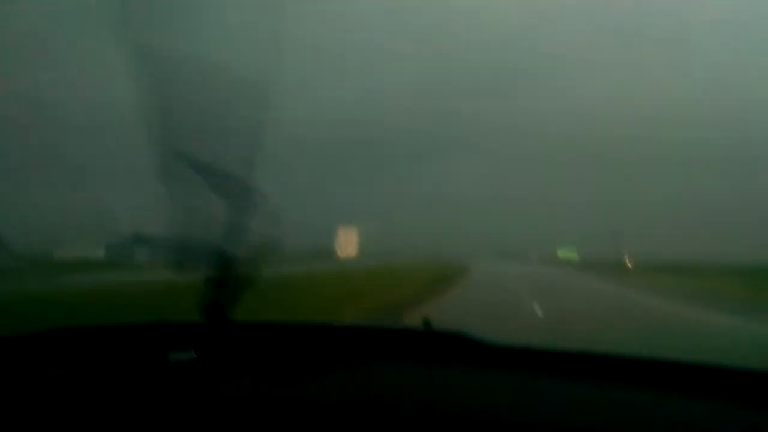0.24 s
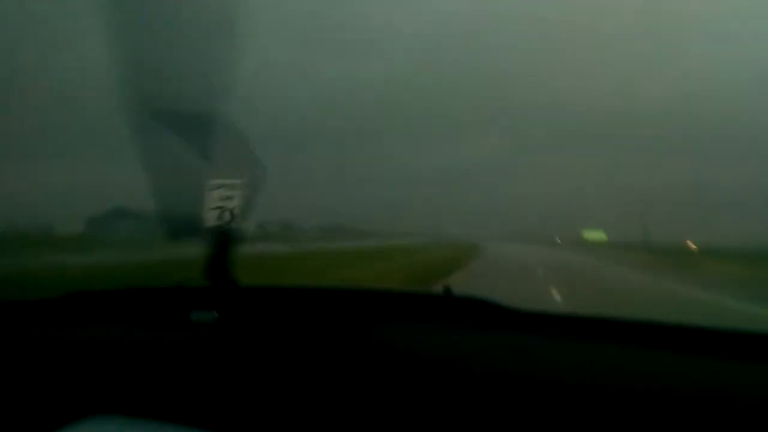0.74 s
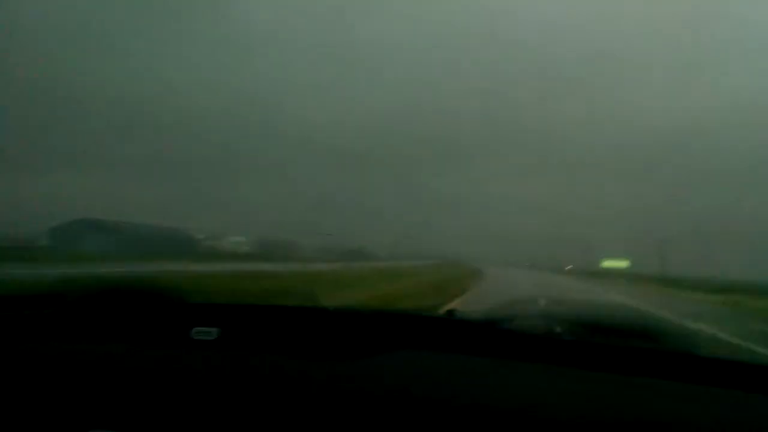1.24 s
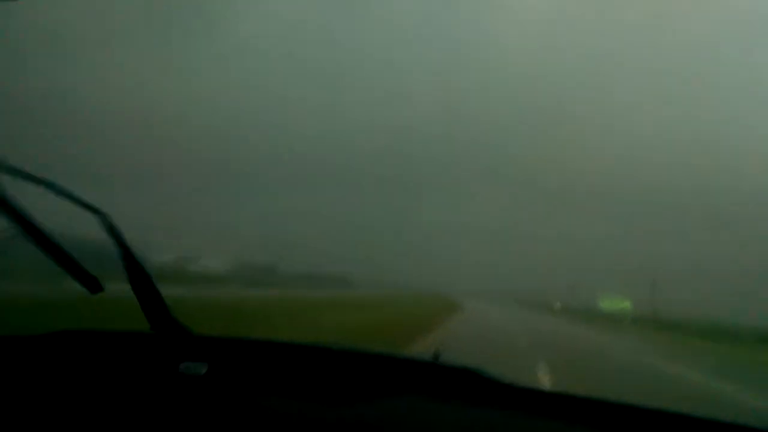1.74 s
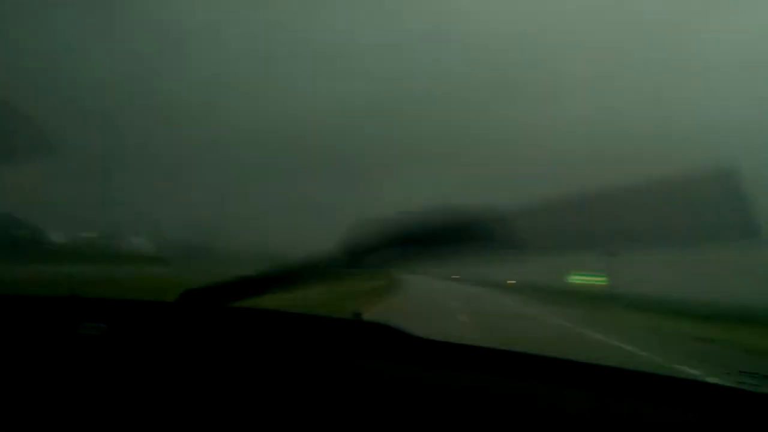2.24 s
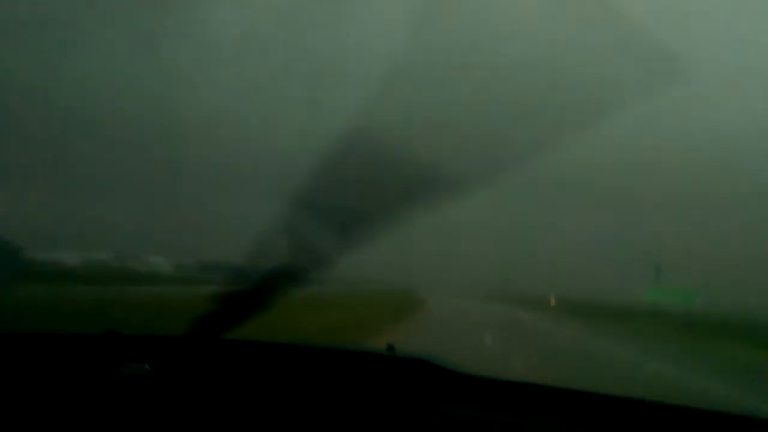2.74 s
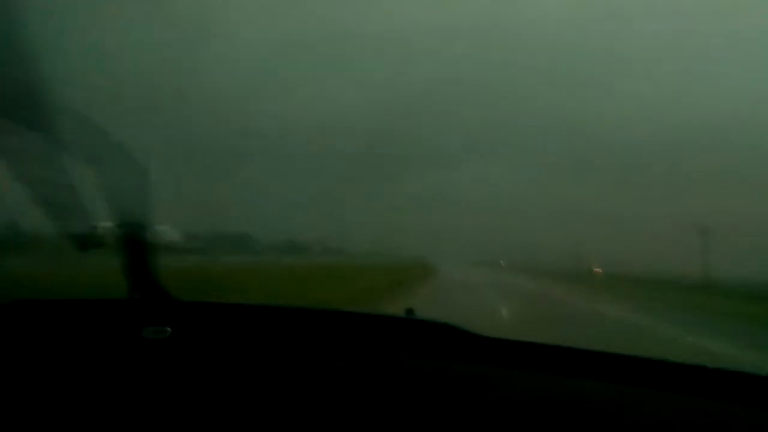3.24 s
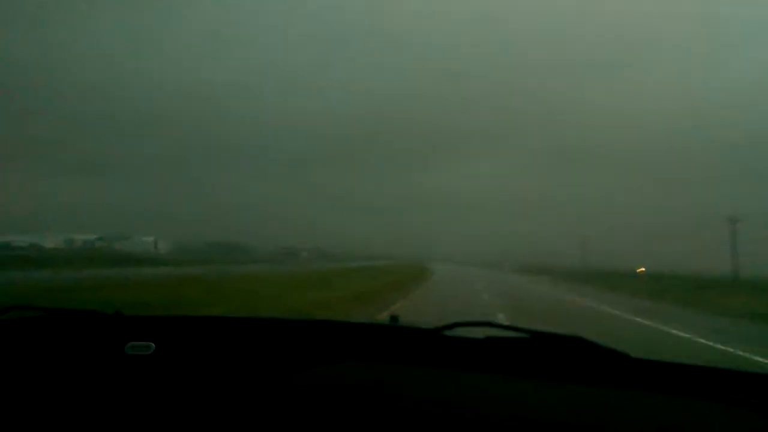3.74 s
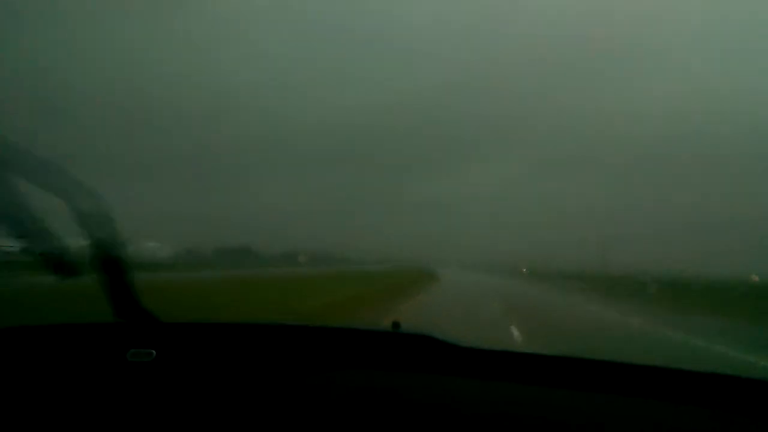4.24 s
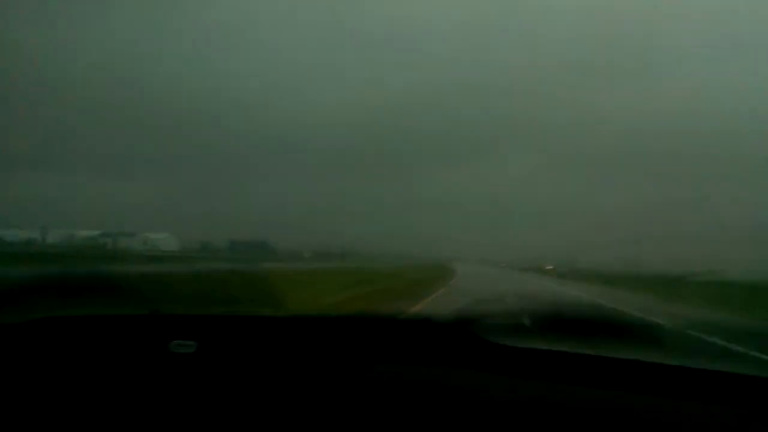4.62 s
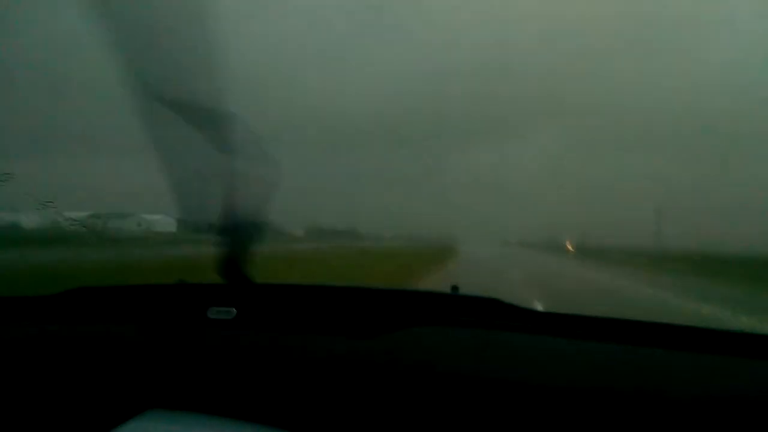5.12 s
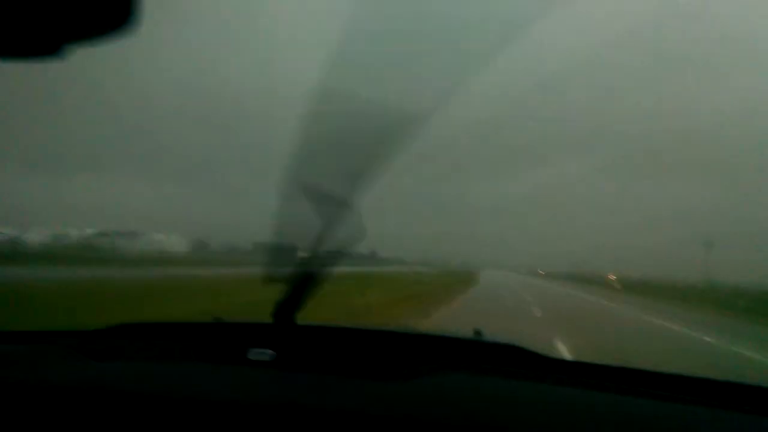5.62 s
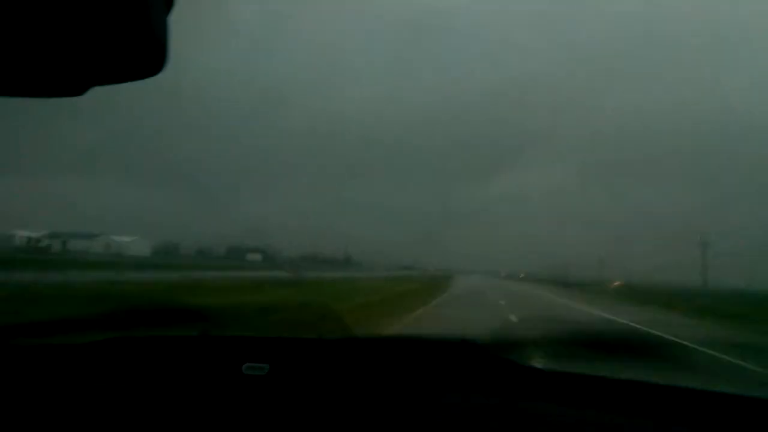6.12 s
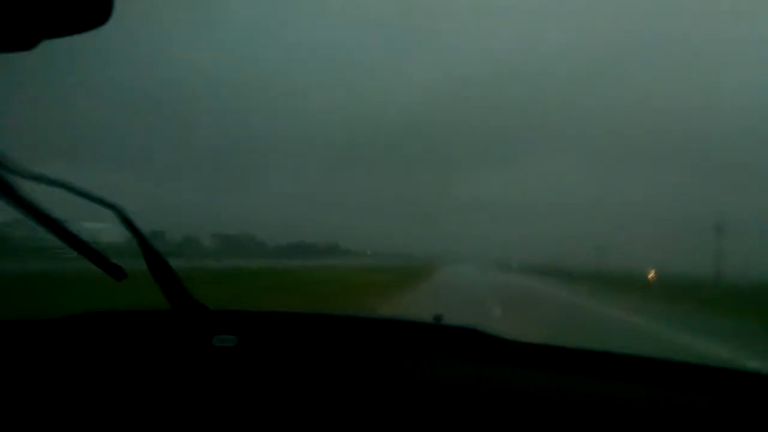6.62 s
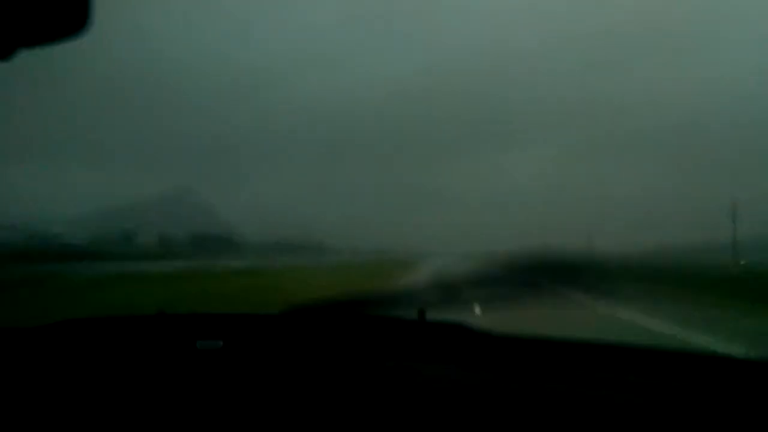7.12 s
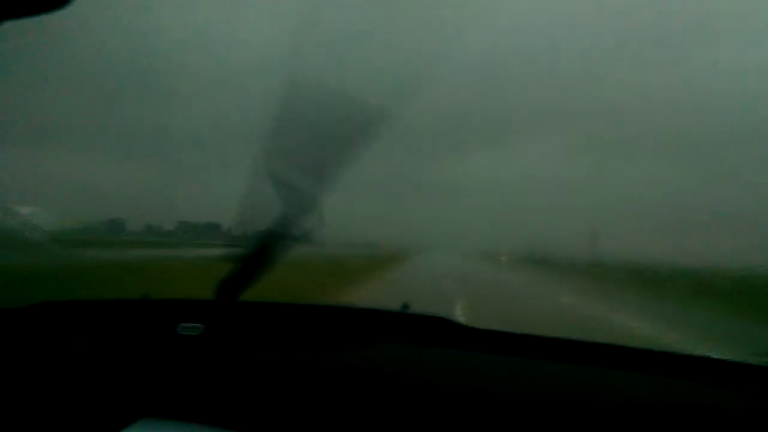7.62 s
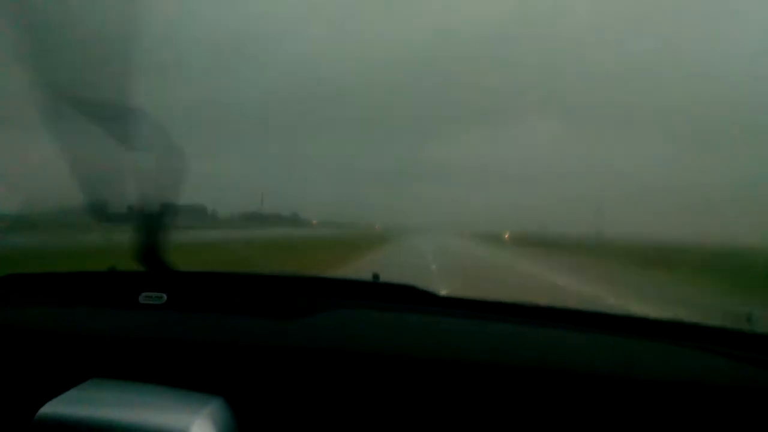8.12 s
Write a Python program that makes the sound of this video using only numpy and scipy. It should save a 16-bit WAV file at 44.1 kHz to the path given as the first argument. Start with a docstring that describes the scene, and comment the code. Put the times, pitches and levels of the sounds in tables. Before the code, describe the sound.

Continuous hard rain dominates, a wide crisp sizzle of drops bursting on glass right ahead, with single fat drops snapping out and dull patter overhead. Tyres hiss and rumble on soaked road, wind shakes the cab mostly on the right, and the engine drones low, easing down after about three seconds. Faint axle whine, shaft throb and muffled wiper swells blend beneath. Close cab stereo pickup.

```python
"""Inside a pickup truck driving through a storm, the wipers sweeping fast, a small stereo camera in the cab.
Bursts of decaying noise make the rain: ticks and glass rings on the windshield, dull drumming on the roof.
Filtered noise makes the roar of wet tyres, the gusts that buffet the cab and the low swell of each wiper sweep.
Drifting sines make the engine, which eases off after a few seconds, the axle's whine and the shaft's throb.
The camera widens it all by subtracting a delayed share of each side from the other."""
import sys
import numpy as np
from scipy import signal
from scipy.fft import rfft, irfft
from scipy.io import wavfile

SR = 44100
rng = np.random.default_rng(int(sys.argv[2]) if len(sys.argv) > 2 else 0)


def generate_wav(sig):
    """Save sig (samples, or channels by samples) to the path in sys.argv[1] as 16-bit PCM at SR."""
    pcm = np.round(np.clip(np.atleast_2d(sig).T, -1, 1) * 32767).astype(np.int16)
    wavfile.write(sys.argv[1], SR, pcm)


N = 368676
TIME, HZ = np.arange(N) / SR, np.fft.rfftfreq(N, 1 / SR)

# Ring of the windshield glass. Each row: frequency in Hz, relative density in dB per Hz.
GLASS_SPECTRUM = [(1500, -22), (2150, -10), (2480, -1.3), (3000, -1.3), (3650, 0), (4250, -2), (4800, -3.5),
                  (5400, -4.2), (6400, -10), (8000, -19), (11000, -30)]
# Fine spray of drops bursting on the glass. Each row: frequency in Hz, relative density in dB per Hz.
SPRAY_SPECTRUM = [(600, -20), (1500, -6), (3000, -2.5), (5000, -1), (6500, -.5), (8000, -.8), (9300, .2),
                  (10500, -.4), (12800, 0), (15200, 1.2)]
# Likeness of the sound at the two microphones. Each row: frequency in Hz, correlation from 0 to 1.
MIC_LIKENESS = [(30, 1), (160, 0.46), (290, 0.054), (420, 0.55), (650, 0.93), (1000, 0.34), (1800, 0.026)]


def gain_of(db):
    """Decibels to amplitude."""
    return 10 ** (np.asarray(db) / 20)


def evened(x):
    """Scales to an rms of 1, over both sides together."""
    return x / np.sqrt(np.mean(x ** 2) + 1e-20)


def over_time(rows):
    """The columns of a curve table at every sample."""
    s, *columns = np.transpose(rows)
    return [np.interp(TIME, s, c) for c in columns]


def over_hz(rows):
    """The columns of a frequency table at every bin, on a logarithmic frequency scale."""
    hz, *columns = np.transpose(rows)
    return [np.interp(np.log(HZ + 1), np.log(hz + 1), c) for c in columns]


def colour(x, spectrum):
    """Filters by a spectrum; white noise keeps its power."""
    response = evened(gain_of(over_hz(spectrum)[0]))
    return irfft(rfft(x) * response, N)


def wander(slow_hz, fast_hz):
    """Random drift of rms 1, mostly between two rates."""
    band = HZ / (HZ + slow_hz) / (1 + (HZ / fast_hz) ** 2)
    return evened(irfft(rfft(rng.standard_normal(N)) * band, N))


def noise_pair(same, lag):
    """White noise at two microphones: partly alike, the left behind by lag radians."""
    a, b = rfft(rng.standard_normal((2, N)))
    same = np.clip(same, -1, 1)
    left = a * np.exp(-1j * lag)
    right = same * a + np.sqrt(1 - same ** 2) * b
    return irfft(np.array([left, right]), N)


def impacts(per_s, spread_db):
    """Drops landing at random: many small, a few large, none beyond a largest size."""
    size = gain_of(spread_db * np.minimum(rng.exponential(1, N), 4.5))
    return size * (rng.random(N) < per_s / SR)


def dying(hits, decay_s):
    """Envelope of overlapping bursts: their energies add up and die away."""
    energy = signal.lfilter([1], [1, -np.exp(-2 / (decay_s * SR))], hits ** 2)
    return np.sqrt(energy + 1e-20)


def in_cabin(envelope, decay_s, wet_db):
    """Glass and dashboard scatter each burst into a short, close tail."""
    keep = np.exp(-2 / (decay_s * SR))
    tail_energy = signal.lfilter([1 - keep], [1, -keep], envelope ** 2)
    return np.sqrt(envelope ** 2 + gain_of(wet_db) ** 2 * tail_energy)


def splash(envelope, spectrum):
    """Each impact scatters differently to the two microphones."""
    return colour(envelope * rng.standard_normal((2, N)), spectrum)


def windshield(rain_db, spray_db):
    """Every drop gives a sharp tick of spray and a brief ring of the glass."""
    hits = impacts(per_s=3200, spread_db=4.0)
    rings = hits * gain_of(5.9 * rng.uniform(-1.9, 1, N))  # the ring depends on where the drop lands
    glass = in_cabin(dying(rings, decay_s=0.0013), decay_s=0.016, wet_db=1.5)
    spray = in_cabin(dying(hits, decay_s=0.00018), decay_s=0.034, wet_db=2.5)
    glass = evened(glass) * gain_of(rain_db + 0.58)
    spray = evened(spray) * gain_of(rain_db + spray_db + 2.5)
    return splash(glass, GLASS_SPECTRUM) + splash(spray, SPRAY_SPECTRUM)


def big_drops(crack_db, ring_db):
    """Single heavy drops crack on the glass above the spatter and make it ring."""
    # Each row: landing time in seconds, relative crack level in dB, relative ring level of the glass in dB.
    heavy_drops = [(0.08, -7.5, -35), (0.3165, -11, -20), (0.3225, -18, -21), (0.602, -12, -25),
                   (0.6765, -6.5, -35), (0.8395, -7, -28), (0.8913, -5.5, -26), (1.1545, -7, -22),
                   (1.2162, -7, -26), (1.3075, -10, -23), (1.3422, -9, -23), (1.4433, -15, -14.5),
                   (1.5352, -13, -17), (1.586, -12, -23), (1.672, -10, -20), (1.9246, -13, -22),
                   (2.051, -8.5, -27), (2.363, -19, -20), (2.3895, -9, -18), (2.805, -10, -23),
                   (3.3112, -12.5, -22), (3.8766, -14, -18), (4.1224, -11, -31), (4.3848, -8.5, -27),
                   (4.4152, -4.5, -23), (4.4997, -8.5, -26), (4.627, -10.5, -30), (4.6697, -7, -20),
                   (4.8976, -12, -30), (4.9738, -19, -22.5), (5.0681, -10, -18), (5.115, -7, -26),
                   (5.4857, -11, -24), (5.7994, -18, -22), (6.2975, -6, -22), (6.5535, -9, -25),
                   (6.7783, -9, -28), (6.8212, -10, -32), (6.902, -8, -20), (7.006, -14, -20),
                   (7.0705, -13, -23), (7.367, -8.5, -34), (7.4725, -10, -29), (7.561, -14, -28),
                   (7.8113, -15, -26), (7.9369, -17, -26), (7.9791, -14, -28)]
    cracks, rings = np.zeros((2, N))
    for s, peak_db, glass_db in heavy_drops:
        cracks[round(s * SR)] = gain_of(peak_db + crack_db)
        rings[round(s * SR)] = gain_of(glass_db + ring_db)
    crack = in_cabin(dying(cracks, decay_s=0.00048), decay_s=0.0067, wet_db=4.0)
    return splash(crack, SPRAY_SPECTRUM) + splash(dying(rings, decay_s=0.0014), GLASS_SPECTRUM)


def near_drops(level_db):
    """Drops right before the camera tick singly, each from its own side, with echoes off the dashboard."""
    # Each row: frequency in Hz, relative density of a tick in dB per Hz.
    tick_spectrum = [(500, -20), (1500, -10), (3000, -7), (5000, -4), (8000, -0.5), (11000, -1),
                     (15000, 0.5), (18000, -4.5)]
    mic_lag_s, mic_shade_db = 0.00011, 4  # a drop at one side reaches that microphone sooner and louder
    echo_s, echo_db = 0.0003, -5.5  # typical delay of the first echo, level change at each bounce
    hits = impacts(per_s=300, spread_db=3.0) * gain_of(level_db)
    at = np.flatnonzero(hits)
    side, path = rng.uniform(-1, 1, (len(at), 2)).T
    ticks = np.zeros((2, N))
    for channel, facing in enumerate((-side, side)):
        for bounce in range(4):  # 0 is the direct tick
            echo_delay_s = bounce ** 1.5 * echo_s * 2 ** path
            arrival_s = at / SR - facing * mic_lag_s + echo_delay_s
            index = np.clip(np.round(arrival_s * SR), 0, N - 1).astype(int)
            size = hits[at] * gain_of(facing * mic_shade_db + bounce * echo_db)
            polarity = rng.choice([-1, 1], len(at))
            ticks[channel] += np.bincount(index, size * polarity, N)
    return colour(ticks, tick_spectrum)


def roof(rain_db):
    """Rain of the same rising and falling strength drums dully through the lined sheet metal."""
    # Each row: frequency in Hz, relative density of the drumming in dB per Hz.
    roof_spectrum = [(120, -15), (350, 0), (650, 1), (800, -2), (960, -3.5), (1180, -1), (1380, -3.7),
                     (2000, -4), (2600, -14), (4000, -35)]
    patter = evened(dying(impacts(per_s=800, spread_db=2.5), decay_s=0.0077))
    noise = noise_pair(over_hz(MIC_LIKENESS)[0], lag=0.21)
    return colour(patter * gain_of(rain_db - 8.0) * noise, roof_spectrum)


def rain_changes():
    """Brief swells and dips raise and lower the rain, in dB."""
    # Brief swells of the rain, and two dips (negative change) like the lulls below. Each row: centre in
    # seconds, half length in seconds, change in dB.
    swells_and_dips = [(0.329, 0.013, 2.5), (0.632, 0.011, -1.5), (0.761, 0.01, -3), (0.875, 0.068, 1.5),
                       (1.31, 0.009, 3), (1.398, 0.034, 3), (1.721, 0.013, 4.5), (1.96, 0.035, 2),
                       (2.056, 0.03, 1.5), (2.337, 0.073, 0.4), (2.536, 0.045, 3.5), (2.743, 0.016, 4),
                       (3.29, 0.17, 2), (3.793, 0.031, 5.5), (4.12, 0.052, 2), (4.39, 0.046, 4),
                       (4.64, 0.063, 1.5), (4.673, 0.008, 3), (5.16, 0.04, 2), (6.006, 0.021, 2.5),
                       (6.123, 0.03, 2), (6.254, 0.025, 2.5), (6.433, 0.018, 1.5), (6.545, 0.035, 1.5),
                       (7.022, 0.12, 1.5), (7.101, 0.012, 3), (7.265, 0.043, 2.5), (7.558, 0.02, 2),
                       (7.65, 0.03, 1), (7.765, 0.017, 1.5), (7.982, 0.024, 3), (8.112, 0.028, 2)]
    # Brief lulls in the rain. Each row: centre in seconds, half length in seconds, change in dB.
    lulls = [(0.14, 0.095, -2.5), (0.46, 0.031, -3.5), (1.006, 0.052, -3), (1.183, 0.02, -1.5),
             (1.329, 0.0088, -2), (1.876, 0.04, -1), (2.445, 0.035, -0.5), (2.785, 0.018, -2),
             (2.857, 0.018, -3.3), (4.27, 0.031, -2), (4.742, 0.058, -4.8), (4.97, 0.11, -2),
             (4.979, 0.048, -4), (5.385, 0.073, -2.5), (6.473, 0.011, -6.5), (6.643, 0.024, -4.5),
             (7.4, 0.033, -4.5), (7.51, 0.025, -3), (7.885, 0.076, -1)]
    edge = 8.9  # how squarely each sets in and ends (2 = a bell)
    return sum(db * np.exp(-abs((TIME - s) / half_s) ** edge) for s, half_s, db in swells_and_dips + lulls)


def road(level_db):
    """Tyres on the wet road roar through the floor and doors."""
    # Each row: frequency in Hz, relative density of the roar in dB per Hz.
    road_spectrum = [(20, -19), (60, 0), (170, -0.5), (215, -3), (290, -4), (340, -1), (400, -2),
                     (500, -5.5), (650, -2.5), (780, -9), (1200, -12.5), (1800, -17), (3000, -41)]
    noise = noise_pair(over_hz(MIC_LIKENESS)[0], lag=0.66)
    return gain_of(level_db + 1.5) * colour(noise, road_spectrum)


def wind(level_db):
    """Lumpy gusts shake the cab, mostly on the right."""
    # Each row: frequency in Hz, relative density of the buffeting in dB per Hz.
    buffet_spectrum = [(8, -2), (20, -8), (34, -0.5), (50, -2), (85, -4.5), (110, -6.5), (170, -7.5),
                       (220, -15.5), (320, -16.5), (800, -48)]
    balance = gain_of([[-11], [2.3]])  # left, right
    return balance * gain_of(level_db) * colour(noise_pair(0.98, lag=1.0), buffet_spectrum)


def wipers():
    """The blades push water across the glass: a soft low swell through the cowl on each sweep."""
    # Each row: loudest moment in seconds, relative level in dB.
    sweeps = [(.42, -32.5), (1.07, -26), (1.6, -27), (2.67, -22), (3.5, -25), (4.32, -28.5), (5.1, -27),
              (5.96, -25), (6.82, -24.5), (7.95, -31)]
    # Rumble of the cowl. Each row: frequency in Hz, relative density in dB per Hz.
    cowl_spectrum = [(70, -16), (120, -4.5), (175, 3.5), (220, -2), (300, -10.5), (450, -10), (900, -38)]
    width_s = 0.083  # standard deviation of each bell-shaped swell
    swell = sum(gain_of(db) * np.exp(-((TIME - s) / width_s) ** 2 / 2) for s, db in sweeps)
    balance = gain_of([[-6], [-1]])
    return balance * swell * colour(noise_pair(0.55, lag=1.6), cowl_spectrum)


def engine():
    """The steady drone of the firing rate; the uneven exhaust booms below it, more at a higher rate."""
    # The engine pulls, then eases off. Each row: time in seconds, firing rate in Hz, relative level in dB.
    pull = [(0, 147.5, -37.5), (0.35, 148.8, -34), (1.35, 148.7, -35.5), (1.75, 150.6, -29),
            (2.1, 150.6, -35), (2.4, 150.2, -33), (2.65, 147.3, -33), (2.95, 130, -35), (3.35, 126, -36.5),
            (3.8, 131, -35), (4.0, 129, -33), (4.4, 122, -34.5), (4.7, 119.3, -38), (5.2, 118.4, -34.5),
            (6.2, 119, -36.5), (6.7, 119.7, -32), (7.5, 119.5, -37), (8.36, 119.5, -37)]
    # Booms of the exhaust. Each row: share of the firing rate, relative level in dB.
    exhaust_booms = [(3 / 8, -3), (5 / 8, 0)]
    cruise_hz = 120
    hz, level_db = over_time(pull)
    boom_db = -9.5 + 0.2056 * (hz - cruise_hz)  # against the drone; grows in dB per Hz
    turns = np.cumsum(hz * (1 + 0.0016 * wander(slow_hz=1, fast_hz=9.8))) / SR  # firing cycles
    left_lag = np.array([[1.1], [0]])  # radians
    sound = np.sin(2 * np.pi * turns - left_lag) * gain_of(1.3 * wander(slow_hz=2.8, fast_hz=9.5))
    for order, db in exhaust_booms:
        flutter_db = 1.2 * wander(slow_hz=2, fast_hz=6.9)
        boom = np.sin(2 * np.pi * order * turns - left_lag)
        sound = sound + boom * gain_of(boom_db + db + flutter_db)
    balance = gain_of([[-1.2], [5.4]])
    return balance * gain_of(level_db) * sound


def drivetrain(whine_hz, shaft_hz):
    """The axle gears whine and the drive shaft throbs; both follow the slowly rising road speed."""
    # Each row: time in seconds, relative whine of the axle in dB, relative throb of the shaft in dB.
    levels = [(0, -43.5, -46), (1.6, -42.5, -39), (2.45, -39, -41), (2.93, -44, -26.5), (3.3, -45, -35),
              (3.9, -39, -35), (4.5, -44.5, -41), (6.3, -43, -42), (7.5, -45.5, -46), (8.36, -46, -40)]
    whine_db, shaft_db = over_time(levels)
    speed = 1 + 0.0036 * TIME + 0.0017 * wander(slow_hz=3.7, fast_hz=20)  # against the starting speed
    travel = np.cumsum(speed) / SR
    left_lag = np.array([[1.0], [0]])  # radians
    whine = np.sin(2 * np.pi * whine_hz * travel) * gain_of(2.4 * wander(slow_hz=2.8, fast_hz=10.0))
    throb = np.sin(2 * np.pi * shaft_hz * travel - left_lag) * gain_of(1.8 * wander(slow_hz=1.5, fast_hz=5))
    whine = gain_of([[-1.2], [1.2]]) * gain_of(whine_db) * evened(whine)
    throb = gain_of([[-9], [4]]) * gain_of(shaft_db) * evened(throb)
    return whine + throb


def scene():
    """Rain ahead and overhead, road, wind and machinery below; the rain's changes move spray and road too."""
    # Steady downpour. Each row: time in seconds, relative strength in dB, spray against glass ring in dB.
    downpour = [(0.0, -28.5, 2.5), (0.6, -28, -1), (1.3, -28.5, 0), (2.05, -26, -0.5), (2.7, -29, -1.7),
                (3.3, -27.5, 0.1), (3.9, -27.5, 0), (4.6, -29, 0), (5.4, -29.5, 0.5), (6.3, -27.5, -0.5),
                (7.0, -29.5, 0.6), (7.6, -31, 0.5), (8.36, -29.5, 0.5)]
    # Noise of the cab. Each row: time in seconds, relative wind buffeting in dB, relative road roar in dB.
    cab = [(0.0, -30, -31.5), (0.15, -29, -32.5), (0.38, -21.5, -29.5), (0.7, -27.5, -33),
           (1.7, -25.5, -31), (1.97, -27.5, -31.0), (2.35, -23.5, -31), (2.95, -22.5, -30),
           (3.55, -26, -30.5), (3.9, -24, -29.5), (4.55, -29.5, -33.5), (5.1, -24.5, -32),
           (5.75, -29.5, -32.5), (6.15, -25, -30.5), (6.6, -30, -32), (6.9, -28, -31.5), (7.55, -35, -36),
           (8.0, -31.5, -33), (8.36, -28.5, -33.5)]
    rain_db, spray_db = over_time(downpour)
    buffet_db, road_db = over_time(cab)
    change_db = rain_changes() + 0.54 * wander(slow_hz=3.6, fast_hz=21.3)  # the drops arrive in clumps
    rain_db = rain_db + change_db
    # heavier rain brings a little more spray, and wets the road (dB per dB); each also flutters by itself
    spray_db = spray_db + 0.053 * change_db + 0.9 * wander(slow_hz=6, fast_hz=13)
    road_db = road_db + 0.33 * change_db + 1.0 * wander(slow_hz=2.8, fast_hz=5.4)
    rain = windshield(rain_db, spray_db) + big_drops(crack_db=-3.0, ring_db=5.5)
    rain = rain + near_drops(rain_db + spray_db + 12) + roof(rain_db)
    machinery = wipers() + engine() + drivetrain(whine_hz=426.5, shaft_hz=36.9)
    return rain + road(road_db) + wind(buffet_db) + machinery


def record(dry):
    """The camera widens the image: each side takes away a delayed share of the other; then the band limit."""
    # Stereo widening, which sets the two sides against each other around 2.5 kHz. Each row: frequency in Hz,
    # share of the right fed into the left, share of the left fed into the right, delay in seconds.
    crossfeed = [(650, 0, 0, .00041), (1250, .63, .54, .00041), (2000, .74, .66, .000404),
                 (2200, .74, .67, .000398), (2265, .74, .67, .000402), (2325, .74, .673, .00043),
                 (2665, .74, .673, .000376), (2760, .74, .67, .00039), (2870, .74, .66, .000399),
                 (3800, .6, .44, .000395), (5100, .47, .26, .000392), (7900, .4, .08, .000382),
                 (10400, .5, .08, .000385), (12800, .7, .1, .000391), (15100, .83, .2, .000396)]
    *shares, delay_s = over_hz(crossfeed)
    sides, share = rfft(dry), np.clip(shares, 0, 1)
    other = sides[::-1] * np.exp(-2j * np.pi * HZ * delay_s)
    wide = irfft(np.sqrt(1 - share ** 2) * sides - share * other, N)
    low_pass = signal.firwin(511, 15520, window=("kaiser", 9), fs=SR)  # cutoff in Hz
    return signal.oaconvolve(wide, low_pass[None], "same")


dry = scene()
out = record(dry)
generate_wav(out)
```